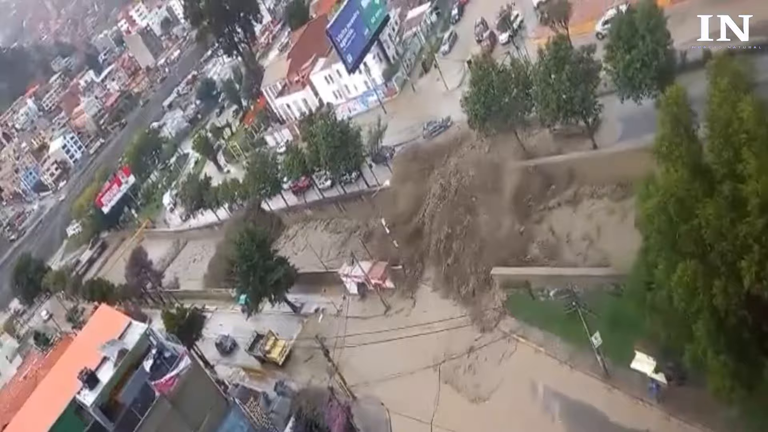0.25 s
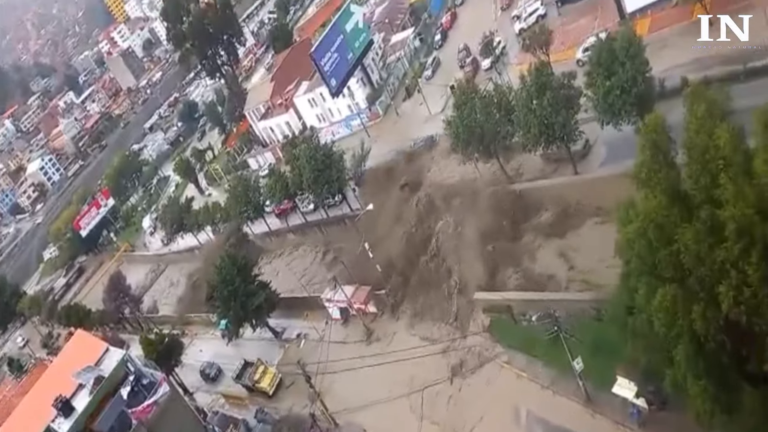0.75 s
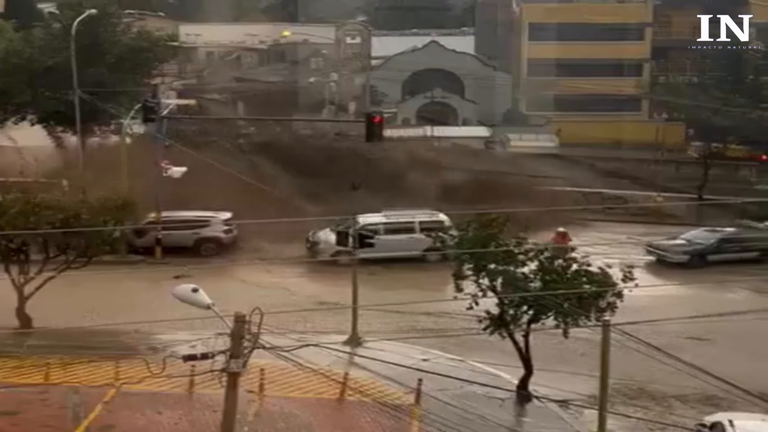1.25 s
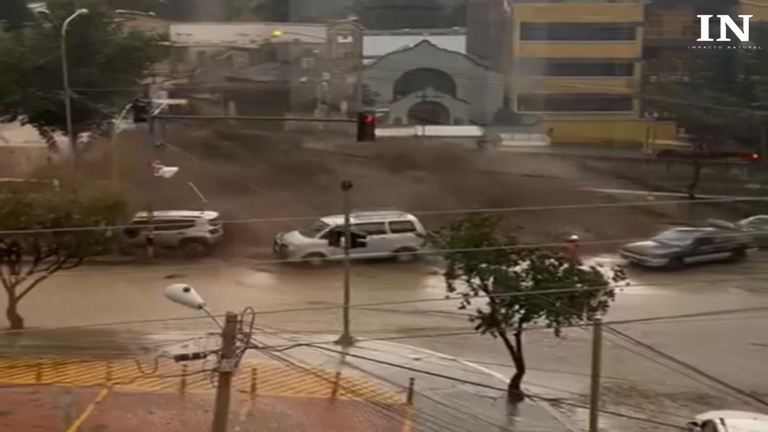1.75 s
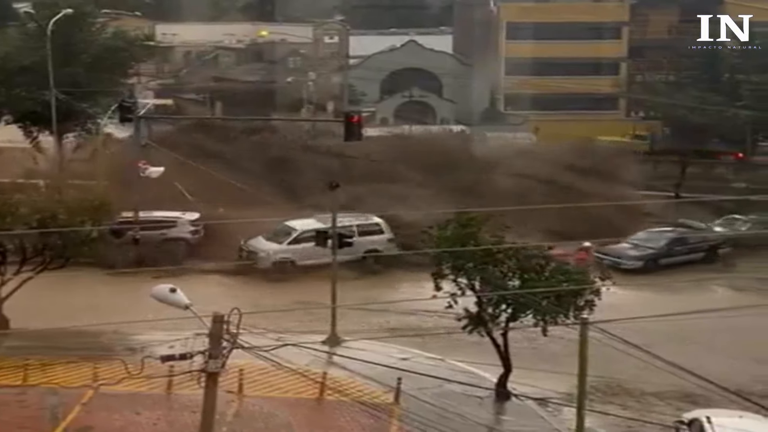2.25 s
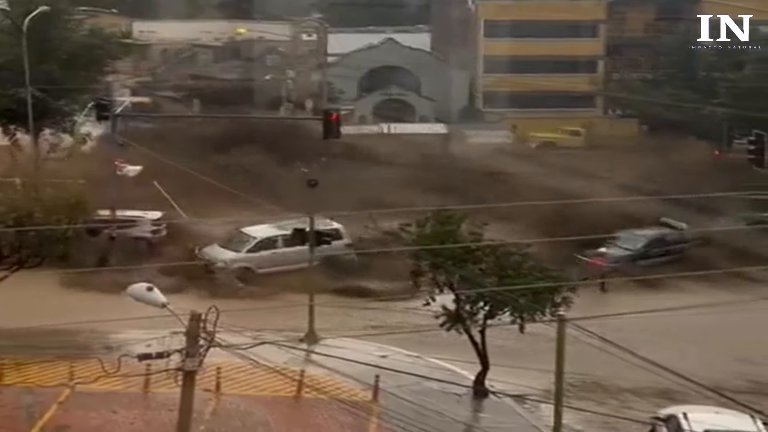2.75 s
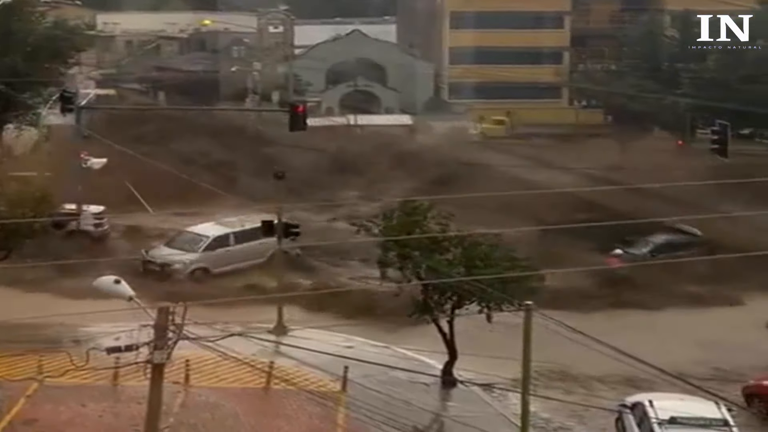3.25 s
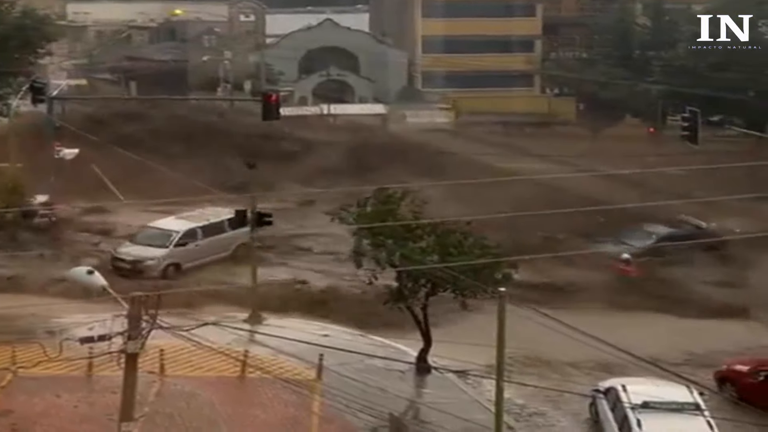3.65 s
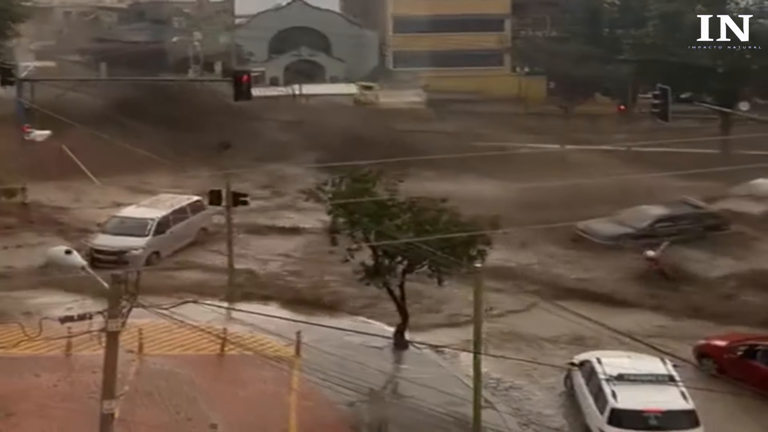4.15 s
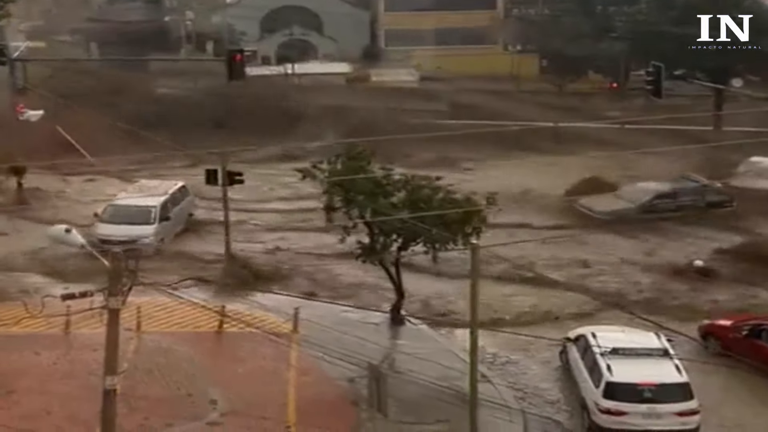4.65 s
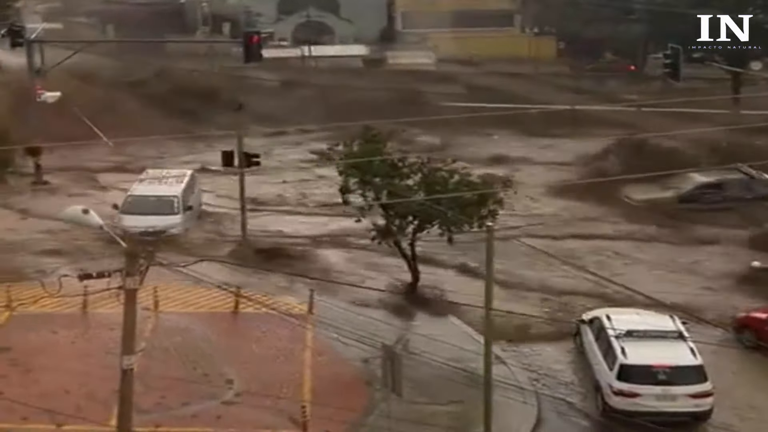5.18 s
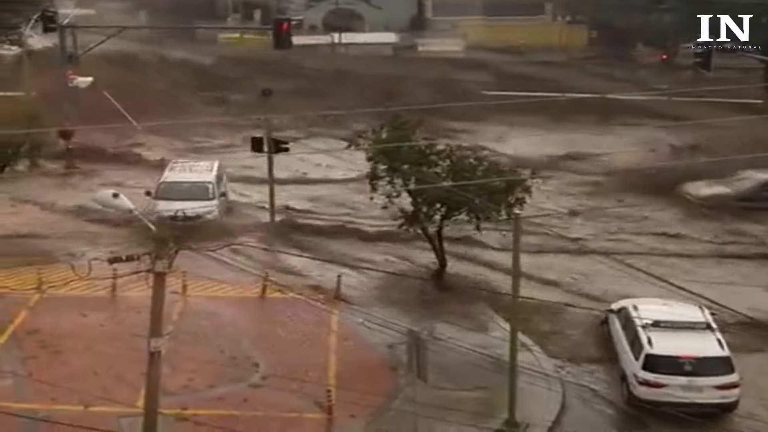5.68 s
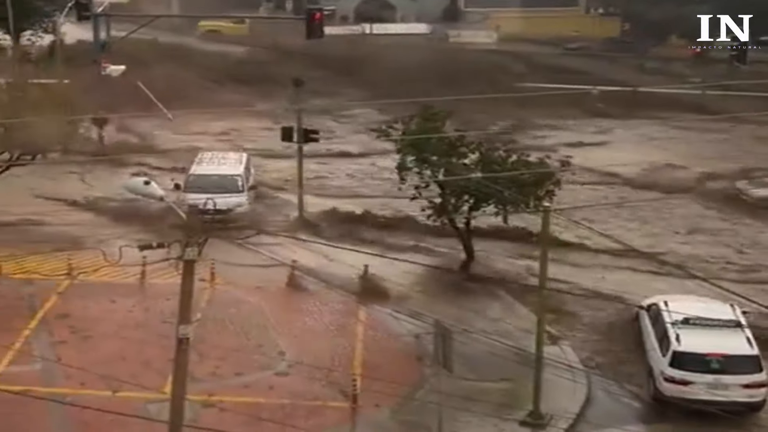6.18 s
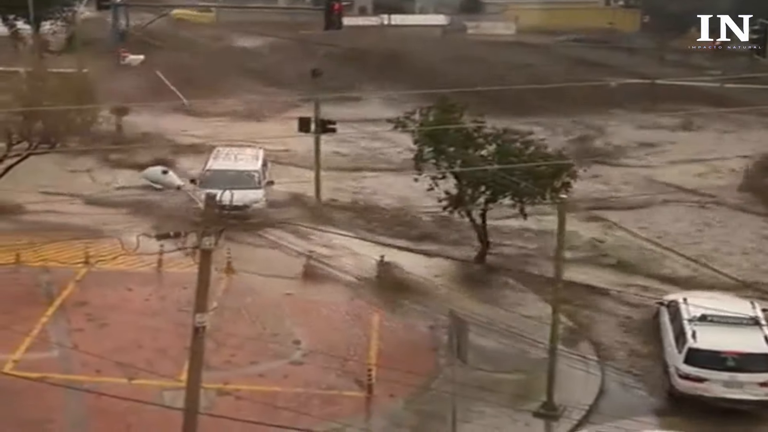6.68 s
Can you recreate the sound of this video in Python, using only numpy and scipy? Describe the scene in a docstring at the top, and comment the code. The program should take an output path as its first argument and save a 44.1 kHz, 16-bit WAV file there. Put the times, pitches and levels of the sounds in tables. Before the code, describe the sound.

A heavy muddy torrent roars and booms with hiss on the right, then abruptly a quieter, deeper rumble of floodwater with a low engine-like drone.

```python
"""A muddy torrent bursts over a road: shaped noise roars, narrow bands boom, spray hisses off to the right.
Abruptly, a flooded street is heard from above: the flow is one noise split into rumble, rush, fizz and mist,
whose spray grows and then eases; rings and short bursts make its drops, slaps and thuds.
A low sine drone, as of an engine, swells and fades. Two wavering sines make a thin far horn near the end.
"""
import sys
import numpy as np
from scipy import signal
from scipy.fft import rfft, irfft
from scipy.io import wavfile
from scipy.ndimage import uniform_filter1d

SR = 44100
rng = np.random.default_rng(int(sys.argv[2]) if len(sys.argv) > 2 else 0)


def int16_out(signal):
    """Quantize to a 16-bit WAV file."""
    q = np.round(np.clip(np.atleast_2d(signal).T, -1, 1) * 32767)
    wavfile.write(sys.argv[1], SR, q.astype(np.int16))


N = 305152
TIME = np.arange(N) / SR
BINS_HZ = np.fft.rfftfreq(N, 1 / SR)
# short-time spectra (samples)
FRAME, HOP = 2048, 256
FRAME_HZ = np.fft.rfftfreq(FRAME, 1 / SR)
FRAMES = N // HOP + 9
CHANGE_S = 1.169  # the torrent ends and the street begins


def gain_of(db):
    """Level law: decibels to an amplitude factor."""
    return 10 ** (np.asarray(db) / 20)


def evened(x):
    """Normalisation: scales a signal to rms 1."""
    return x / np.sqrt(np.mean(x ** 2) + 1e-20)


def read(points, hz=FRAME_HZ):
    """Interpolation of a table over logarithmic frequency."""
    f, value = np.transpose(points)
    return np.interp(np.log(hz + 1), np.log(f + 1), value)


def curve(rows, axis=1):
    """Linear interpolation of one column of a table over time."""
    rows = np.asarray(rows)
    return np.interp(TIME, rows[:, 0], rows[:, axis])


def ramp(start_s, length_s):
    """Raised-cosine onset from 0 to 1."""
    return np.sin(np.pi / 2 * np.clip((TIME - start_s) / length_s, 0, 1)) ** 2


def bumps(rows):
    """Gaussian envelopes, summed as amplitude, from rows of (t/s, half length/s, level/dB)."""
    return sum(gain_of(db) * np.exp(-((TIME - s) / half_s) ** 2) for s, half_s, db in rows)


def wander(rate_hz):
    """Random modulation: low-passed noise of rms 1 whose spectrum fades around the given rate."""
    return evened(irfft(rfft(rng.standard_normal(N)) * np.exp(-(BINS_HZ / rate_hz) ** 2), N))


def below(f, edge_hz, order=4):
    """Butterworth magnitude of a low-pass."""
    return 1 / np.sqrt(1 + (f / edge_hz) ** (2 * order))


def above(f, edge_hz, order=4):
    """Butterworth magnitude of the matching high-pass."""
    return (f / edge_hz) ** order * below(f, edge_hz, order=order)


def around(f, hz, octaves):
    """Band-pass magnitude: a Gaussian over log frequency."""
    return np.exp(-(np.log2((f + 1) / hz) / octaves) ** 2)


def shaped(x, gain):
    """Linear filtering of a stereo pair; the mean of its channels is set to rms 1."""
    y = irfft(rfft(x) * gain(BINS_HZ), N)
    return y / np.sqrt(np.mean(y.mean(0) ** 2) + 1e-20)


def add(mix, s, sound):
    """Superposition: mixes a sound in at a time."""
    part = mix[:, round(s * SR):][:, :sound.shape[1]]
    part += sound[:, :part.shape[1]]


def churn(spectrum_db, apart, lead, patchy_db, flicker_db):
    """Turbulence as partly coherent stereo noise: patches drift above a steady bass, all pitches flicker."""
    a, b, c, d, patches = rng.standard_normal((5, FRAMES, len(FRAME_HZ)), dtype=np.float32)
    patches = uniform_filter1d(uniform_filter1d(patches, size=12, axis=0), size=24, axis=1)
    patches = evened(patches) * above(FRAME_HZ, edge_hz=580, order=1)
    flicker = evened(uniform_filter1d(rng.standard_normal(FRAMES), size=8))[:, None]
    # the right channel shares part of the left and lags it in phase
    own = np.clip(gain_of(read(apart)), 0, 1)
    left = a + 1j * b
    right = (np.sqrt(1 - own ** 2) * left + own * (c + 1j * d)) * np.exp(-1j * read(lead))
    level = gain_of(spectrum_db) * gain_of(patchy_db * patches + flicker_db * flicker)
    frames = np.array([left, right]) * level
    noise = signal.istft(frames.transpose(0, 2, 1), nperseg=FRAME, noverlap=FRAME - HOP)[1][:, :N]
    return noise * signal.windows.tukey(N, .002)


def splashes(per_s, low_hz, high_hz, cycles, spread_db, count=24):
    """Bubble and drop resonance, blurred by distance: short soft rings, per_s in each channel on average."""
    out = np.zeros((2, N))
    t = np.arange(SR // 20) / SR
    for hz in np.geomspace(low_hz, high_hz, count):
        age = hz * t / cycles
        ring = np.sin(2 * np.pi * hz * t) * age ** 2 * np.exp(-age ** 2) * np.sqrt(low_hz / hz)
        # exponential waits make the rings fall at random; ln 2 splits the channels evenly
        wait, size, side = rng.exponential(1, (3, 1000))
        when = np.cumsum(wait) * count / (2 * per_s)
        gains = gain_of(spread_db * np.minimum(size, 4))
        for s, gain, right in zip(when[when < TIME[-1]], gains, side > np.log(2)):
            add(out[int(right)][None], s, gain * ring[None])
    return evened(out)


def heaved(water, rows):
    """Band-limited swelling: each moving mass of water lifts one band of the flow for a moment."""
    out = np.zeros((2, N))
    for s, half_s, hz, db in rows:
        band = shaped(water, lambda f: around(f, hz, octaves=0.69))
        out += bumps([(s, half_s, db)]) * band
    return out


# far horn: sets in, then fades
HORN_START_S, HORN_RISE_S, HORN_DB, HORN_FADE_DB_PER_S = 6.02, 0.13, -63, 7
# partials of the far horn: f/Hz, relative level/dB
HORN_PARTIALS = [(1600, 1), (2003, -3)]


def horn():
    """Propagation: only two upper partials carry over the water, and the air makes them waver."""
    tones = np.zeros(N)
    for hz, db in HORN_PARTIALS:
        size = gain_of(db + 2.8 * wander(rate_hz=7.8))
        tones += size * np.sin(2 * np.pi * hz * TIME + .5 * wander(rate_hz=12))
    level_db = HORN_DB - HORN_FADE_DB_PER_S * (TIME - HORN_START_S)
    return np.sqrt(2) * tones * ramp(HORN_START_S, HORN_RISE_S) * gain_of(level_db)


# the drone drops once from a fast pitch to a slow one
DRONE_FAST_HZ, DRONE_SLOW_HZ, DRONE_DROP_AT_S, DRONE_DROP_S = 86.26, 70.7, 2.37, 0.071
DRONE_IDLE_DB, RELEASE_S = -42, 0.46
# swells of the drone: start t/s, rise/s, length/s, level/dB, sag/(dB per s)
DRONE_SWELLS = [(1.168, 0.24, 1.25, -32, 1.5), (2.622, 0.39, 0.94, -23, 12), (3.4, 0.58, 1.97, -29, 3.5),
                (5.76, 0.22, 1.75, -28.8, 3)]


def drone():
    """Harmonic synthesis: a hum, with weak octaves, swells out of an idling level, sags and dies away."""
    pitch_hz = DRONE_FAST_HZ + (DRONE_SLOW_HZ - DRONE_FAST_HZ) * ramp(DRONE_DROP_AT_S, DRONE_DROP_S)
    turns = np.cumsum(pitch_hz + 0.3 * wander(rate_hz=3.03)) / SR
    octave_up, octave_down = np.sin(2 * np.pi * 2 * turns), np.sin(np.pi * turns)
    tone = np.sin(2 * np.pi * turns) + gain_of(-27.5) * octave_up + gain_of(-25) * octave_down
    size = gain_of(DRONE_IDLE_DB)
    for start, rise, length, db, sag_db_per_s in DRONE_SWELLS:
        gate = ramp(start, rise) * (1 - ramp(start + length - RELEASE_S, RELEASE_S))
        level_db = db - sag_db_per_s * np.maximum(TIME - start - rise, 0)
        size = np.maximum(size, gate * gain_of(level_db))
    return evened(tone) * size * gain_of(0.5 * wander(rate_hz=8))


# part of the street sound that the channels do not share: f/Hz, level/dB
STREET_APART = [(40, -42), (130, -34), (220, -18), (420, -7), (900, -.3), (1400, -.3), (1800, -1.9),
                (2250, -.6), (2500, -6), (2750, -8), (3100, -1.2), (4400, -.3), (5300, -1.2), (5800, -10),
                (6700, -13), (7050, -.8), (7500, -20), (8600, -20), (9100, -.8), (9600, -26), (11000, -24)]
# phase by which the left channel leads: f/Hz, phase/rad
STREET_LEAD = [(150, 0), (220, -.08), (420, -.5), (900, 0), (1800, .2), (2250, 1.5), (2480, 3.1),
               (2850, 3.1), (4200, 1.3), (5100, 1.8), (5800, 3.1), (6850, 3.1), (7250, 0), (8850, 0),
               (9400, 3.14)]


def at_ports(x):
    """Interchannel coherence: gives two unrelated signals the street's likeness and phase difference."""
    left, other = rfft(x)
    own = np.clip(gain_of(read(STREET_APART, BINS_HZ)), 0, 1)
    right = (np.sqrt(1 - own ** 2) * left + own * other) * np.exp(-1j * read(STREET_LEAD, BINS_HZ))
    return irfft(np.array([left, right]), N)


SLAP_RISE_S, SLAP_OCTAVES = 0.011, .3
# small laps at random: the higher, the weaker; the decay varies by half either way
LAP_LOW_HZ, LAP_HIGH_HZ, LAP_MEAN_DECAY_S = 550, 4900, 0.037
LAP_MAX_DB, LAP_TILT_DB, LAP_SPREAD_DB = -51.5, 8, 4.5
# waves that slap and throw spray: t/s, f/Hz, decay/s, level before the envelope/dB
SLAPS = [(1.96, 1800, 0.068, -58), (2.96, 2400, 0.043, -53), (2.97, 4400, .03, -61),
         (3.51, 760, 0.037, -49), (3.835, 9200, 0.018, -60), (3.876, 9500, .02, -67),
         (3.91, 2650, .03, -57), (3.915, 9500, 0.018, -69), (4.11, 3000, .035, -54), (4.5, 1450, .03, -55),
         (4.525, 9500, .02, -69), (4.66, 10500, 0.052, -67), (5.725, 5600, 0.035, -61),
         (6.098, 9500, .02, -64), (6.138, 9700, .022, -60), (6.82, 650, .04, -49)]


def slaps():
    """Impulsive noise: waves break on cars and kerbs in bursts of spray that rise fast and patter out."""
    out = np.zeros((2, N))
    t = np.arange(SR // 4) / SR
    f = np.fft.rfftfreq(len(t), 1 / SR)
    when, pitch, length, size = rng.random((80, 4)).T
    laps = zip(CHANGE_S + when * (TIME[-1] - CHANGE_S),
               LAP_LOW_HZ * (LAP_HIGH_HZ / LAP_LOW_HZ) ** pitch,
               LAP_MEAN_DECAY_S * (.5 + length),
               LAP_MAX_DB - LAP_TILT_DB * pitch - LAP_SPREAD_DB * size)
    for s, hz, decay_s, db in list(SLAPS) + list(laps):
        spectrum = rfft(rng.standard_normal((2, len(t)))) * around(f, hz, SLAP_OCTAVES)
        burst = evened(irfft(spectrum, len(t)))
        fade = np.exp(-np.maximum(t - SLAP_RISE_S, 0) / decay_s)
        add(out, s, gain_of(db) * burst * np.minimum(t / SLAP_RISE_S, 1) * fade)
    return out


# gains added to the columns of the surge
RUMBLE_GAIN_DB, RUSH_GAIN_DB, FIZZ_GAIN_DB, MIST_GAIN_DB = 4, 0.32, 1.04, 2.5
STREET_EDGE_HZ = 11250  # the street has almost no treble above this
# spectrum of the flooded street: f/Hz, relative density level/dB
FLOOD = [(20, -38.5), (36, -23.5), (54, 2), (72, -0.8), (105, -2.5), (165, -5.5), (250, -13), (370, -17),
         (460, -17.5), (750, -27), (950, -28.5), (1250, -29.5), (1850, -36), (2650, -38), (3150, -33),
         (4300, -43), (5400, -42.5), (7200, -46.5), (8100, -51), (9200, -54), (10500, -57.5),
         (11500, -62.5)]
# course of the flood, before the gains above: t/s, rumble/dB, rush/dB, fizz/dB, fine spray/dB
SURGE = [(1.25, -36.5, -49.6, -63, -80), (2.3, -38, -49.5, -65, -80.5), (3.0, -35.5, -48, -62.5, -77.5),
         (3.7, -36.8, -47.5, -62, -75.5), (3.9, -36, -47.5, -62, -74), (4.12, -37.5, -47, -61, -73.5),
         (4.23, -36.5, -48, -60.5, -74.5), (4.38, -36.5, -48, -61.5, -73.5),
         (4.7, -37, -47.5, -61.5, -74.5), (4.85, -37.5, -48, -62.5, -77), (5.45, -37, -47, -62.5, -77.5),
         (5.72, -37.5, -47, -62, -75), (6.17, -35, -46, -61.5, -75.5), (6.45, -35.5, -47, -62.5, -78),
         (6.9, -35.5, -46, -62.5, -78)]
# dull thuds: t/s, half length/s, f/Hz, level/dB
THUDS = [(4.236, 0.067, 149, -38.5), (6.17, .022, 147, -34)]


def street():
    """Band splitting of a wide flow: its mass rumbles, waves rush, foam fizzes and fine spray hisses."""
    water = churn(read(FLOOD), STREET_APART, STREET_LEAD, patchy_db=1.47, flicker_db=0.44)
    rush_hz, fizz_hz, mist_hz = 330, 2500, 6500  # lower edges of the bands
    rumble = shaped(water, lambda f: below(f, rush_hz) ** 2)
    rush = shaped(water, lambda f: (above(f, rush_hz) * below(f, fizz_hz)) ** 2)
    gurgles = gain_of(-11) * splashes(per_s=420, low_hz=488.5, high_hz=1502, cycles=7.7, spread_db=1.0)
    bubbles = gain_of(-19) * splashes(per_s=40, low_hz=901, high_hz=1550, cycles=16, spread_db=2.5)
    fizz = shaped(water, lambda f: (above(f, fizz_hz) * below(f, mist_hz)) ** 2)
    fizz = gain_of(-1.1 + .45 * wander(rate_hz=18)) * fizz
    drops = splashes(per_s=320, low_hz=3200, high_hz=5400, cycles=14, spread_db=2.5)
    foam = fizz + gain_of(-10.5) * at_ports(drops)
    mist = gain_of(.7 * wander(rate_hz=18)) * shaped(water, lambda f: above(f, mist_hz) ** 2)
    droplets = gain_of(-2.0) * splashes(per_s=200, low_hz=6000, high_hz=11000, cycles=9, spread_db=1.5)
    flow = rumble * gain_of(curve(SURGE, axis=1) + RUMBLE_GAIN_DB)
    flow += (rush + gurgles + bubbles) * gain_of(curve(SURGE, axis=2) + RUSH_GAIN_DB)
    flow += foam * gain_of(curve(SURGE, axis=3) + FIZZ_GAIN_DB)
    flow += (mist + at_ports(droplets)) * gain_of(curve(SURGE, axis=4) + MIST_GAIN_DB)
    flow += at_ports(slaps()) + heaved(water, THUDS)
    return irfft(rfft(flow) * below(BINS_HZ, STREET_EDGE_HZ, order=50), N)


# the deepest note sinks and keeps sounding between heaves
THROB_START_HZ, THROB_END_HZ, THROB_SINK_S, THROB_DB = 87.4, 70.6, 0.525, -23.5
# heaves added to that note: t/s, half length/s, level/dB
HEAVES = [(0.07, 0.16, -26), (0.368, 0.082, -17)]
# phase by which the left channel leads in the torrent: f/Hz, phase/rad
TORRENT_LEAD = [(30, 0), (80, -.22), (110, -.35), (300, -.85), (440, -1.1), (560, -2), (750, -1.6),
                (1000, -2.3), (1400, -4.4)]


def throb():
    """Frequency and amplitude modulation: the torrent's deepest note heaves while its pitch sinks."""
    sink = np.exp(-(TIME / THROB_SINK_S) ** 2)
    pitch_hz = THROB_END_HZ + (THROB_START_HZ - THROB_END_HZ) * sink
    size = gain_of(THROB_DB) + bumps(HEAVES)
    angle = 2 * np.pi * np.cumsum(pitch_hz) / SR
    return size * np.sin([angle, angle - read(TORRENT_LEAD, pitch_hz)])


# the torrent pours steadily
ROAR_DB, SPRAY_DB, SPRAY_DROPS_DB = -17.5, -24.5, -40.5
# spectra before the shading of each channel: f/Hz, relative density level/dB
ROAR = [(20, -44), (48, -23), (72, 1), (92, -4.5), (120, -2.5), (158, -0.5), (185, -7), (300, -3),
        (360, -11.5), (450, -8.5), (590, -17), (760, -15), (1000, -24), (1600, -29), (3000, -70)]
SPRAY = [(400, -26), (800, -3.5), (1200, -3), (2050, 0.5), (3100, -9), (4200, -13.5), (5600, -18.5),
         (7100, -12.5), (7800, -20), (8400, -25.5), (10500, -26.5), (12000, -24.5), (15300, -31)]
# balance of the channels: f/Hz, left minus right/dB
TORRENT_SIDE = [(60, 0.5), (400, -1), (700, 1), (1000, -9), (1350, -9), (2400, -16.5), (4400, -15.5),
                (8000, -32.5), (15000, -34)]
# part that the channels do not share: f/Hz, level/dB
TORRENT_APART = [(60, -14), (160, -13), (280, -9.3), (560, -4), (1000, -1), (1800, -.05)]
# hollow booming in the roar: f/Hz, width/Hz, level/dB
BOOMS = [(230, 15.6, -27), (416, 11, -34), (570, 25, -37)]
# tumbling masses of water: t/s, half length/s, f/Hz, level/dB
TUMBLES = [(0.335, 0.022, 190, -30), (0.51, 0.025, 180, -28), (0.521, 0.02, 755, -33),
           (0.998, 0.055, 190, -25)]


def facing(f):
    """Acoustic shading: the left channel loses treble, and both shed the deepest bass."""
    ratio = gain_of(read(TORRENT_SIDE, f))
    sides = np.array([ratio, np.ones(len(f))]) / np.sqrt(1 + ratio ** 2)
    return sides * above(f, edge_hz=88, order=2)


def booming():
    """Narrow-band noise: carriers with randomly wandering amplitude and phase boom hollowly."""
    booms = np.zeros((2, N))
    for hz, width_hz, db in BOOMS:
        swing = (wander(width_hz) + 1j * wander(width_hz)) * np.exp(2j * np.pi * hz * TIME)
        booms += gain_of(db) * np.real([swing, swing * np.exp(-1j * read(TORRENT_LEAD, hz))])
    return booms


def torrent():
    """Turbulent noise: tumbling water roars and booms, and its spray hisses into the right channel."""
    roar = churn(read(ROAR), TORRENT_APART, TORRENT_LEAD, patchy_db=1.3, flicker_db=0.77)
    roar = shaped(roar, facing)
    spray = churn(read(SPRAY), TORRENT_APART, TORRENT_LEAD, patchy_db=0.93, flicker_db=0.97)
    spray = shaped(spray, facing)
    drops = splashes(per_s=970, low_hz=1198, high_hz=4900, cycles=7.1, spread_db=1.0)
    drops = shaped(drops, facing)
    water = gain_of(ROAR_DB) * roar + heaved(roar, TUMBLES)
    hiss = gain_of(SPRAY_DB) * spray + gain_of(SPRAY_DROPS_DB) * drops
    return water + hiss + booming() + throb()


def scene():
    """Succession and superposition: the torrent gives way abruptly to the street, drone and horn."""
    return np.where(TIME < CHANGE_S, torrent(), street() + drone() + horn())


def record(dry):
    """Band limitation: soft ends, then the recorder's linear-phase low-pass."""
    soft = dry * signal.windows.tukey(N, .001)
    low_pass = signal.firwin(511, 15640, window=("kaiser", 9), fs=SR)  # edge in Hz
    return signal.oaconvolve(soft, low_pass[None], "same")


dry = scene()
out = record(dry)
int16_out(out)
```